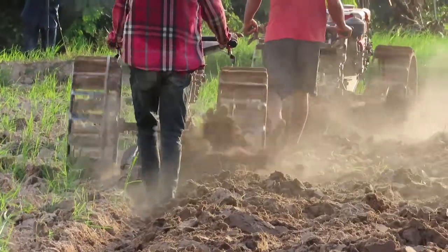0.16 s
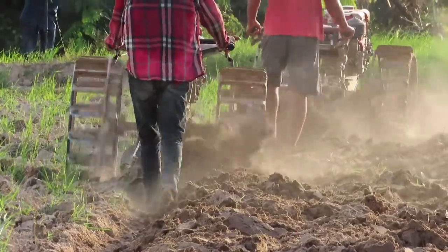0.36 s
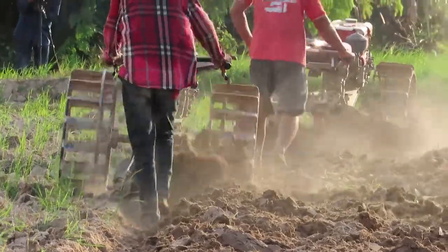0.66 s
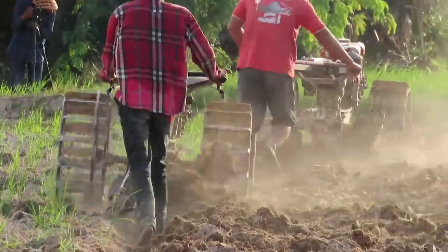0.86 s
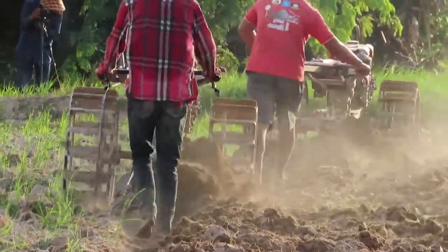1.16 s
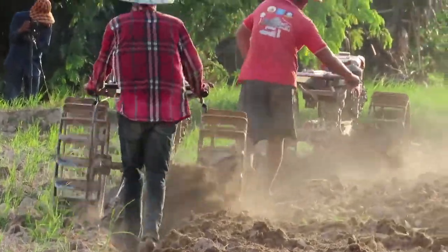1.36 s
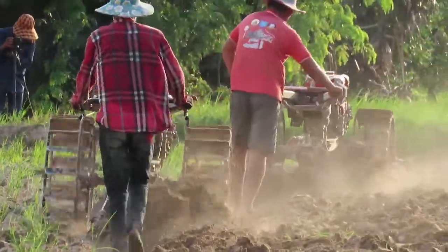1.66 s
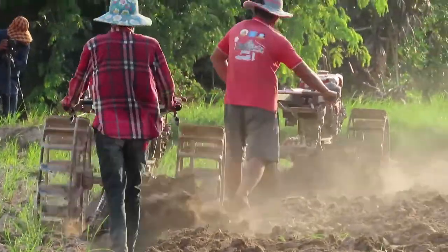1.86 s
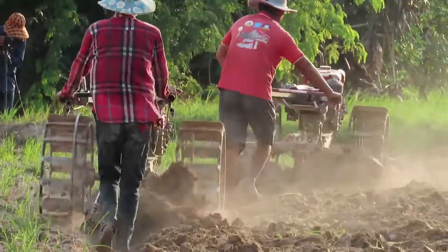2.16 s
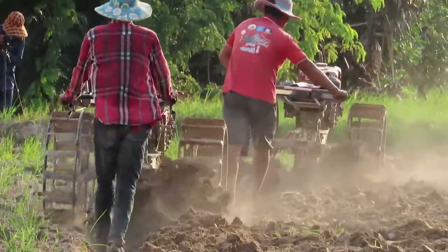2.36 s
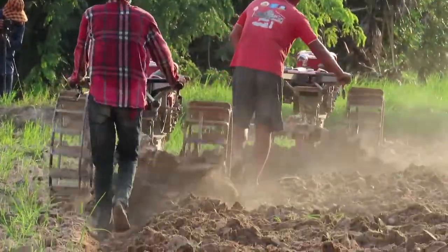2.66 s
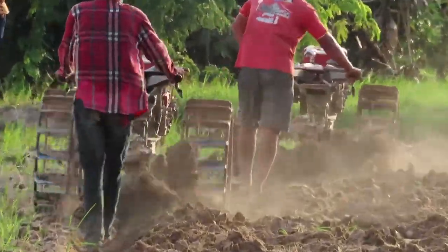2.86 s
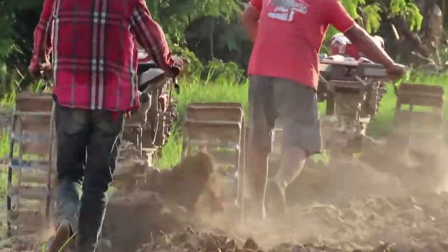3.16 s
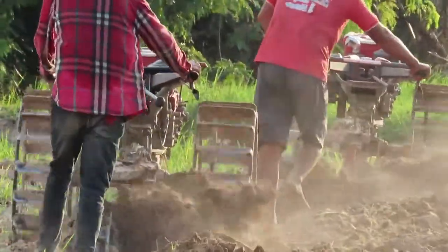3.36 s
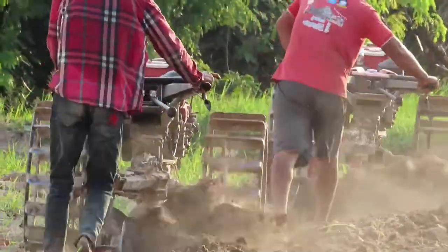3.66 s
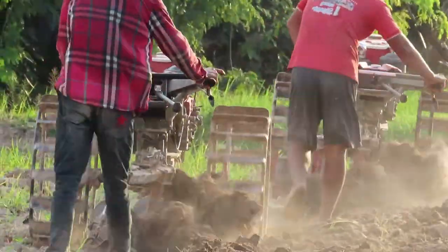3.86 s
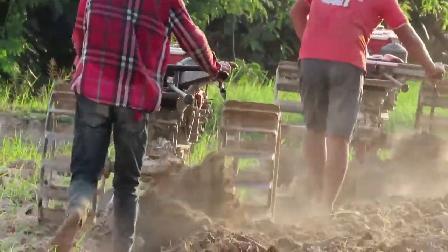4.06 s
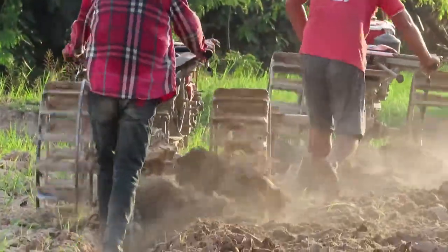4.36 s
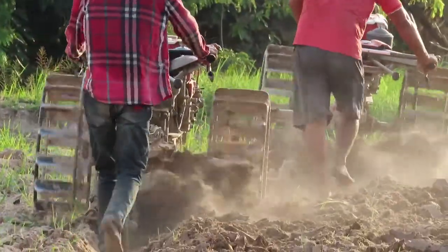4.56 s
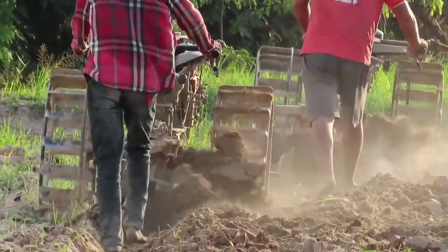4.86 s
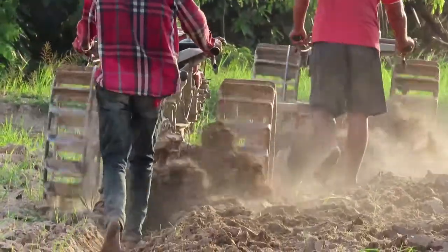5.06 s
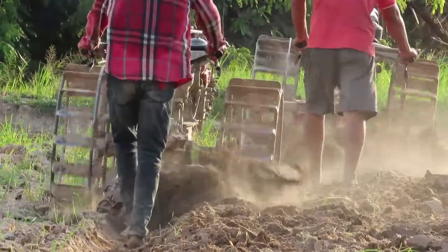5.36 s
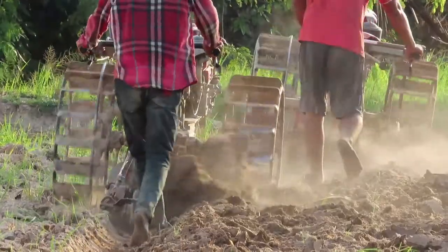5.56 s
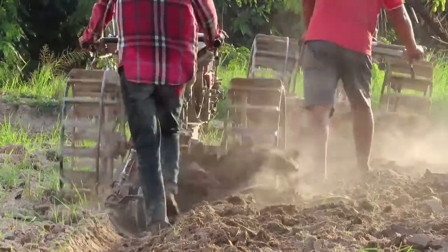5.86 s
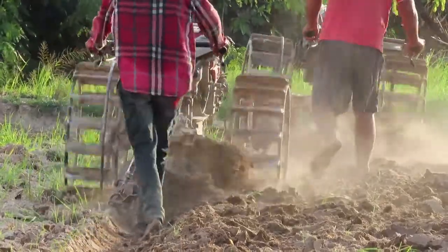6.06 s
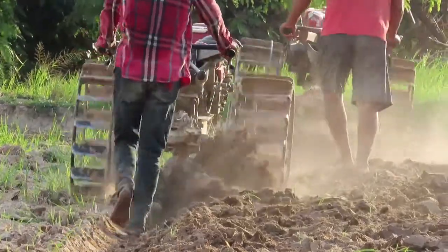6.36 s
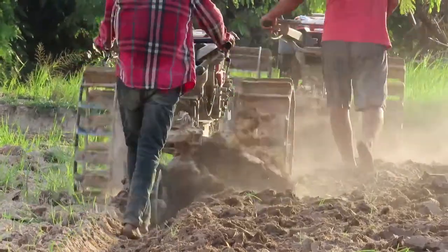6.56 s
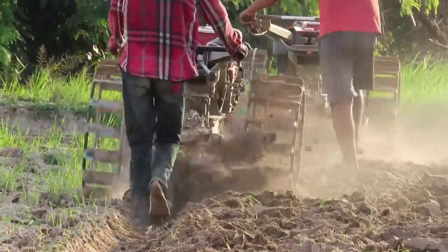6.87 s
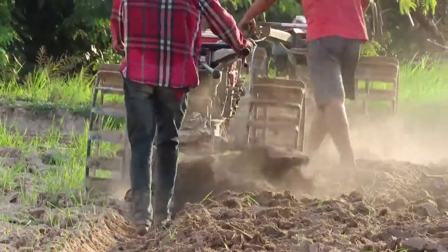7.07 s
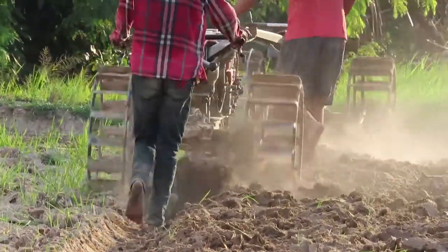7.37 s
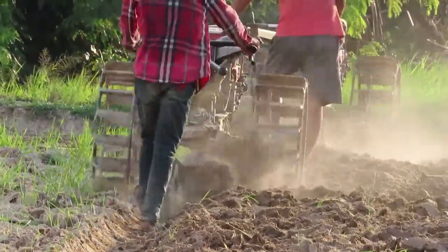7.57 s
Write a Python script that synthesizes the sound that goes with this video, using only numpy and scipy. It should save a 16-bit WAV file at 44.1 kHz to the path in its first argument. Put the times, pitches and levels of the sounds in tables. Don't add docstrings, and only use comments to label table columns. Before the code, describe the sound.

Continuous hard, clattery engine noise from a pair of single-cylinder tractors working a few metres ahead outdoors. One knock is darker, the other sharper and brighter, fading into the mix later. Tin covers clank and loose parts tick. Low gusts hit the unprotected microphone at irregular moments as muffled thumps, heaviest between four and a half and just over six seconds. Light treble hiss spreads wide, with no echo.

```python
import sys
import numpy as np
from scipy import signal
from scipy.fft import rfft, irfft
from scipy.io import wavfile
from scipy.ndimage import uniform_filter1d

SR = 44100
rng = np.random.default_rng(int(sys.argv[2]) if len(sys.argv) > 2 else 0)


def to_linear_factor(level_db):
    exponent = np.asarray(level_db, float) / 20
    return 10 ** exponent


def master(y):
    cut = np.clip(np.atleast_2d(y).T, -1, 1)
    pcm = np.round(cut * 32767)
    wavfile.write(sys.argv[1], SR, pcm.astype(np.int16))


N = 340893
TIME = np.arange(N) / SR
FREQ = np.fft.rfftfreq(N, 1 / SR)


def unit(x):
    return x / np.sqrt(np.mean(x ** 2))


def curve(rows):
    s, value = np.transpose(rows)
    return np.interp(TIME, s, value)


def colour(x, outline):
    hz, db = np.transpose(outline)
    gain_db = np.interp(np.log(FREQ + 1), np.log(hz), db, left=-120)
    return irfft(rfft(x) * to_linear_factor(gain_db), N)


def ring(x, hz, width_hz):
    detune = (FREQ ** 2 - hz ** 2) / ((FREQ + 1) * width_hz)
    return irfft(rfft(x) / (1 + 1j * detune), N)


def noise():
    return rng.standard_normal(N)


def walk(rate_hz):
    hold = int(SR / rate_hz)
    held = np.repeat(rng.standard_normal(N // hold + 1), hold)
    return unit(uniform_filter1d(uniform_filter1d(held, hold), hold)[:N])


def strike(age_s, rise_s, fall_s):
    return (1 - np.exp(-age_s / rise_s)) * np.exp(-age_s / fall_s)


def engine(speed, wait_cycles, level, odd, taps, rise_s, fall_s, scatter_db):
    rate = curve(speed)
    cycle = np.cumsum(rate) / SR + rise_s * rate - wait_cycles
    count = np.maximum(cycle, 0).astype(int)
    place = cycle % 1
    chance = rng.standard_normal((count[-1] + 1, 1 + len(taps)))
    shape = 0
    for k, (at, tap_db) in enumerate([(0.05, 0), *taps]):
        age_s = np.maximum(place - at, 0) / rate
        shape = shape + to_linear_factor(tap_db + scatter_db * chance[count, k]) * strike(age_s, rise_s, fall_s)
    db = curve(level)
    for s, extra_db in odd:
        db = db + extra_db * (np.abs(TIME - s) < .03)
    return shape * to_linear_factor(db) * (cycle >= 0), place


def knock(shape, outline, rings):
    burst = shape * unit(colour(noise(), outline))
    return burst + sum(4 * to_linear_factor(db) * ring(burst, hz, width_hz) for hz, width_hz, db in rings)


# time in seconds, firings per second.
DULL_SPEED = [
    (0, 11.263),
    (.55, 11.969),
    (1.1, 11.78),
    (2.4, 11.978),
    (3.1, 11.004),
    (4.3, 10.523),
    (5.6, 10.387),
    (7.3, 10.433),
    (7.73, 10.113),
]
# time in seconds, level in dB.
DULL_LEVEL = [(0, -37.5), (.9, -43), (1.4, -37), (2.5, -41), (2.8, -50), (3.1, -44), (3.6, -41), (5.0, -41),
              (6.2, -44.5), (7.0, -40), (7.73, -43.5)]
# time in seconds, extra level in dB.
DULL_ODD = [(.33, -5), (.42, -11), (.5, -2.5), (1.77, -0.5), (2.27, -1), (3.6, -6), (3.69, 4.5), (3.88, 3),
            (4.25, 2.5), (4.92, 4.5), (5.2, -6), (5.4, 1), (5.49, 3.5), (5.88, 3), (6.26, 2), (6.36, -4),
            (6.84, 3), (6.46, 2.5), (7.03, 2), (7.32, 4), (7.51, -4)]
# place in cycle 0-1, level in dB re the knock.
DULL_TAPS = [(.21, -12.5), (.49, -12.5)]
# frequency in Hz, level in dB per Hz.
DULL_KNOCK = [(1500, -15), (3300, 6), (4500, 1), (6500, -9.5), (9000, -14.5), (12000, -25), (15500, -30)]
# frequency in Hz, width in Hz, level in dB.
DULL_RINGS = [(3420, 170, -16.5), (6320, 170, -9.5), (6950, 180, -18)]


def dull_engine():
    shape, place = engine(DULL_SPEED, .782, DULL_LEVEL, DULL_ODD, DULL_TAPS,
                          rise_s=.0025, fall_s=.005, scatter_db=1.0)
    return to_linear_factor(8.5) * knock(shape, DULL_KNOCK, DULL_RINGS), shape, place


# time in seconds, firings per second.
BRIGHT_SPEED = [
    (0, 10.313),
    (.5, 10.097),
    (1.8, 10.216),
    (2.6, 10.03),
    (3.8, 10.411),
    (5, 10.373),
    (7.73, 10.374),
]
# time in seconds, level in dB.
BRIGHT_LEVEL = [(0, -50), (.6, -46), (1.2, -46), (1.6, -44), (2.0, -49), (2.3, -43), (2.6, -42.5),
                (2.9, -64), (3.5, -52), (4.3, -57.5), (5.1, -64), (7.73, -67)]
# time in seconds, extra level in dB.
BRIGHT_ODD = [(.40, 5.5), (.69, 2), (1.09, 1), (1.29, 3), (1.38, 8), (1.48, 1.5), (1.78, 5.5), (2.17, 4.5),
              (3.26, 2), (3.35, -5), (3.45, 3), (3.84, 5), (4.51, 9)]
# place in cycle 0-1, level in dB re the knock.
BRIGHT_TAPS = [(.76, -12)]
# frequency in Hz, level in dB per Hz.
BRIGHT_KNOCK = [(1500, -28), (3500, 4), (5000, -3), (7000, -0.5), (10000, -8.5), (12500, -9.5),
                (15500, -12)]
# frequency in Hz, width in Hz, level in dB.
BRIGHT_RINGS = [(4820, 270, -2), (9920, 220, -2), (11700, 250, -9)]
# time in seconds, extra level above 8 kHz in dB.
INJECTOR = [
    (0, -20),
    (3.1, -20),
    (3.3, 4),
    (4.2, 4),
    (4.7, -3),
    (7.73, -10),
]


def bright_engine():
    shape, place = engine(BRIGHT_SPEED, .028, BRIGHT_LEVEL, BRIGHT_ODD, BRIGHT_TAPS,
                          rise_s=.003, fall_s=.0026, scatter_db=1.3)
    knocks = to_linear_factor(15.0) * knock(shape, BRIGHT_KNOCK, BRIGHT_RINGS)
    treble = [(7000, -30), (9000, 11), (12000, 10), (15500, 4)]
    injector = colour(knock(shape, BRIGHT_KNOCK, BRIGHT_RINGS), treble)
    return knocks + to_linear_factor(curve(INJECTOR)) * injector, place


def body(modes, swell, flicker_db):
    jolts_db = walk(60)
    out = 0
    for hz, width_hz, db in modes:
        drive = noise() * swell * to_linear_factor(db + jolts_db + flicker_db * walk(20))
        out = out + ring(ring(drive, hz, width_hz), hz, width_hz)
    return unit(out)


# frequency in Hz, width in Hz, level in dB.
LOW_BODY = [(568.6, 172, -12), (676.3, 84, -6.5), (764, 137, -9.5), (1019.6, 158, -4.5),
            (1120.6, 44.3, 1.5), (1199, 58, -6)]
HIGH_BODY = [(1249, 350, -2), (1463, 270, 0), (1663, 224, 1.5), (1902, 440, -4), (2302, 242, 4),
             (2814, 470, -6.5), (3360, 330, -32)]


def clatter(machine_db, dull_shape, dull_place, bright_place):
    swell = 1 + .45 * np.exp(-dull_place / .12) + .25 * np.exp(-bright_place / .08)
    idle_turn = .3 * np.exp(-((dull_place - .45) % 1) / .08)
    low = to_linear_factor(-33.5 + machine_db) * body(LOW_BODY, swell + idle_turn, flicker_db=-0.1)
    high = to_linear_factor(-32 + machine_db) * body(HIGH_BODY, swell + 70 * dull_shape, flicker_db=-0.16)
    return low + high


# start in seconds, end in seconds.
TREBLE_DIP_S = (2.915, 3.385)


def treble_dip():
    edge_s, loss_db, opened_db, fade_s = .03, -9, 2, 0.48
    shut, opened = (np.clip((TIME - s) / edge_s + .5, 0, 1) for s in TREBLE_DIP_S)
    since_s = np.maximum(TIME - TREBLE_DIP_S[1], 0)
    return loss_db * (shut - opened) + opened_db * opened * np.exp(-since_s / fade_s)


# frequency in Hz, level in dB per Hz.
RATTLE = [(2500, -32), (3300, 4), (4200, -3), (6000, -11.5), (8000, -17.5), (9500, -25), (11000, -48)]
RATTLE_TOP = [(8500, -16), (9800, -7.5), (11500, -11), (13000, -13), (15500, -23)]


def rattle(machine_db, dip_db):
    tick_db = 1.45 * rng.exponential(size=N // 40 + 1).repeat(40)[:N]
    ticks = noise() * to_linear_factor(tick_db)
    main_db = -48.5 + 0.87 * machine_db + dip_db
    top_db = -71 + 0.86 * machine_db + dip_db - .5 * (TIME - 3)
    main = to_linear_factor(main_db) * unit(colour(ticks, RATTLE))
    top = to_linear_factor(top_db) * unit(colour(ticks, RATTLE_TOP))
    return (main + top) * to_linear_factor(walk(25))


# frequency in Hz, level in dB per Hz.
PORTS = [(880, -23), (1500, -12.5), (2050, -8), (2400, -4.5), (3510, -9.5), (4900, -9), (12100, -19.5),
         (15600, -20)]


def port_hiss(machine_db, dip_db, knocks):
    hiss_db = -55 + machine_db + 0.47 * dip_db + 0.34 * (TIME - 3)
    return to_linear_factor(hiss_db) * unit(colour(noise(), PORTS)) + to_linear_factor(-24) * np.roll(knocks, 60)


# frequency in Hz, width in Hz, depth 0-1.
DIPS = [(930, 50, 0.34), (2570, 135, 0.54), (3113, 143, 0.63), (3610, 120, 0.05)]


def ground(x):
    for hz, width_hz, depth in DIPS:
        x = x - depth * ring(x, hz, width_hz)
    return x


# time in seconds, level in dB.
MACHINE_LEVEL = [(0, 2), (.35, 2.5), (.95, 0), (1.3, 3), (1.8, 3.5), (2.3, 2), (2.75, -.5), (3.2, .5), (3.7, -0.5),
                 (4.4, 0), (4.7, -2), (5.5, -2), (6.2, -1.5), (6.7, 0), (7.1, -.5), (7.73, 0)]


def tractors():
    machine_db, dip_db = curve(MACHINE_LEVEL), treble_dip()
    bright_knocks, bright_place = bright_engine()
    dull_knocks, dull_shape, dull_place = dull_engine()
    knocks = bright_knocks + dull_knocks
    machine = clatter(machine_db, dull_shape, dull_place, bright_place)
    mid = ground(machine + knocks + rattle(machine_db, dip_db))
    return mid, port_hiss(machine_db, dip_db, knocks)


def gust(s, length_s, sag, rise, fall):
    age_s = TIME - s
    rise_db = rise * np.minimum(age_s, 0)
    sag_db = sag * (np.clip(age_s, 0, length_s) - length_s / 2)
    fall_db = fall * np.maximum(age_s - length_s, 0)
    return to_linear_factor(rise_db - sag_db - fall_db)


# start in seconds, length in seconds, rumble in dB, buffet in dB.
GUSTS = [(.01, .07, -40.5, -46), (0.128, 0.065, -30.5, -37), (.23, .06, -28, -27), (.31, .15, -32.5, -34.5),
         (.68, 0.2, -39, -44), (1.26, 0.12, -28, -37), (1.423, 0.051, -36.5, -37.5),
         (1.61, .12, -37.5, -41.5), (1.9, 0.14, -42, -48), (2.417, 0.16, -36, -45),
         (2.644, 0.049, -38.5, -56), (2.742, 0.13, -36, -46), (3.156, 0.071, -43, -53),
         (3.257, 0.08, -33.5, -45), (3.38, 0.034, -35, -47), (3.843, 0.064, -33.5, -43),
         (4.33, 0.064, -34, -35.5), (4.44, 0.081, -30, -42), (5.02, .02, -36, -40), (5.14, .03, -34, -30.5),
         (5.18, .07, -36, -46), (5.27, .09, -41, -42), (5.476, 0.13, -37.5, -46), (5.94, .09, -36, -44),
         (6.185, 0.098, -22.5, -25.5), (6.31, 0.063, -40, -37), (6.7, 0.07, -44, -51),
         (6.81, .18, -39, -47), (7.062, 0.1, -27.5, -35), (7.19, 0.1, -36.5, -42.5)]
SLAMS = [
    (3.5, 0.22, -33.5, -40.5),
    (3.97, 0.061, -28, -33),
    (4.165, 0.15, -25.5, -31),
    (4.575, 0.11, -22, -17.5),
    (4.73, 0.12, -19.5, -22),
    (5.055, .07, -29, -22.5),
    (5.69, 0.056, -34, -35.5),
    (5.815, 0.099, -30.5, -33.5),
    (6.052, .097, -21, -16.5),
]


def gust_levels():
    calm_db = 2.5 * walk(12)
    rumble, buffet = to_linear_factor(-48.5 + calm_db), to_linear_factor(-64.5 + calm_db)
    # sag, rise, fall in dB per s
    for rows, slopes in ((GUSTS, (22, 504, 400)), (SLAMS, (-4, 800, 1100))):
        for s, length_s, rumble_db, buffet_db in rows:
            shape = gust(s, length_s, *slopes)
            rumble = np.maximum(rumble, to_linear_factor(rumble_db) * shape)
            buffet = np.maximum(buffet, to_linear_factor(buffet_db) * shape)
    return rumble, buffet


def eddies(outline, span_s):
    x = colour(noise(), outline)
    span = int(span_s * SR)
    return x / np.sqrt(uniform_filter1d(uniform_filter1d(x ** 2, span), span))


# time in seconds, peak in dB, frequency in Hz.
POPS = [(0.254, -13, 210), (0.268, -9, 373), (0.32, -16, 293), (0.368, -13, 229), (0.419, -28, 210),
        (1.303, -11.5, 343), (2.805, -25, 216), (3.621, -14.5, 200), (3.688, -15, 200), (4, -24, 287),
        (4.183, -23, 202), (4.298, -7, 212), (4.609, -12, 334), (4.636, 1, 257), (4.774, -1.5, 210),
        (4.826, -13, 210), (5.055, -6.5, 300), (5.154, -18, 207), (5.701, -30, 215), (5.813, -22, 200),
        (6.055, 1.5, 214), (6.192, -6.5, 275), (6.201, -12, 347), (7.111, -12, 292), (.455, -21, 219),
        (3.315, -19, 190), (3.575, -18, 179), (4.484, -16, 260), (5.289, -21, 219), (5.335, -21.5, 220)]
# time in seconds, peak in dB, frequency in Hz.
CLOD = (2.011, -16, 390)


def pops():
    out = np.zeros(N)
    for s, db, hz in [*POPS, CLOD]:
        age_s = TIME - s - .003
        swing = np.cos(2 * np.pi * hz * age_s - np.pi / 4)
        out += to_linear_factor(db - 3.0) * np.exp(-(age_s * hz / 0.55) ** 2) * swing
    return out


# frequency in Hz, level in dB per Hz.
RUMBLE = [(20, -26), (40, -24), (80, -0.5), (120, 2.5), (165, 5.5), (200, 0), (260, -16), (400, -74)]
BUFFET = [(130, -26.5), (210, -0.5), (320, -4), (460, -10), (520, -21.5), (700, -7.5), (900, -54),
          (1300, -86)]
BREEZE = [(15, -18), (30, -1.5), (60, 5), (100, 10), (200, -4), (400, -1.5), (600, -37.5)]


def wind():
    rumble, buffet = gust_levels()
    flutter = walk(70)
    gusty = buffet * to_linear_factor(2.2 * flutter - 1)
    gusts = rumble * to_linear_factor(3.05 * flutter - 3.5) * eddies(RUMBLE, 0.044)
    gusts += gusty * eddies(BUFFET, .025) + pops()
    wind_filter = [(15, -10), (60, -1.5), (480, 0.5), (540, -5.0), (900, -25), (1500, -60)]
    mid = colour(gusts, wind_filter) + to_linear_factor(-45.5) * unit(colour(noise(), BREEZE))
    uneven = to_linear_factor(-14.5) * gusty ** 1.45
    uneven_outline = [(100, -40), (170, -18), (350, 11.5), (480, 7), (560, -4.5), (1400, -13), (2200, -30)]
    side = uneven * eddies(uneven_outline, 0.017)
    leaning = to_linear_factor(-14) * np.sqrt(gusty) * mid
    return mid, side - ring(ring(leaning, 380, 330), 380, 330)


# time in seconds, peak in dB, frequency in Hz.
CLANKS = [(0.1481, -22, 1083), (0.924, -22, 1185), (1.6188, -16, 1094), (1.6868, -14, 1097),
          (1.7663, -15.5, 1102), (1.8597, -18, 1155), (2.0506, -18, 1153), (2.1321, -18, 1100),
          (2.2582, -20.5, 1118), (3.1588, -21.5, 1130), (3.3602, -29, 1107), (3.5718, -28, 1120),
          (4.146, -24, 1098), (4.9207, -29, 1075), (5.6278, -24, 1132), (6.3999, -35, 1160)]


def clanks():
    out = np.zeros(N)
    for s, db, hz in CLANKS:
        age_s = np.maximum(TIME - s, 0)
        out += to_linear_factor(db - 2) * strike(age_s, 0.0025, .017) * np.sin(2 * np.pi * hz * age_s)
    return out


# start in seconds, length in seconds, from Hz, to Hz, level in dB.
CHIRPS = [
    (2.977, .018, 3650, 3550, -42),
    (3.023, 0.029, 3500, 4030, -43),
    (3.054, 0.022, 4830, 4900, -48),
    (3.160, .012, 4800, 4900, -59),
    (3.35, .018, 3500, 3580, -43),
]


def birds():
    out = np.zeros(N)
    for s, length_s, from_hz, to_hz, db in CHIRPS:
        place = np.clip((TIME - s) / length_s, 0, 1)
        hz = from_hz + (to_hz - from_hz) * place
        out += to_linear_factor(db) * np.sin(np.pi * place) * np.sin(2 * np.pi * np.cumsum(hz) / SR)
    return out


def scene():
    mid, side = np.add(tractors(), wind())
    mid = mid + clanks() + birds()
    return np.array([mid + side, mid - side])


def roll_off(x):
    return signal.sosfilt(signal.butter(12, 15700, fs=SR, output="sos"), x)


def record(dry):
    return roll_off(dry)


dry = scene()
out = record(dry)
master(out)
```